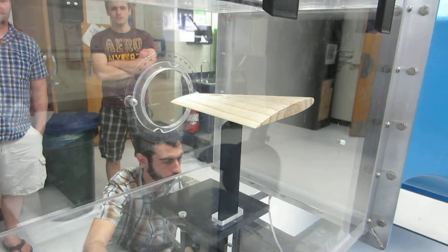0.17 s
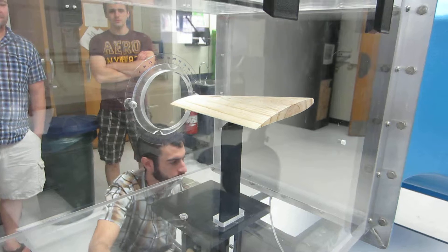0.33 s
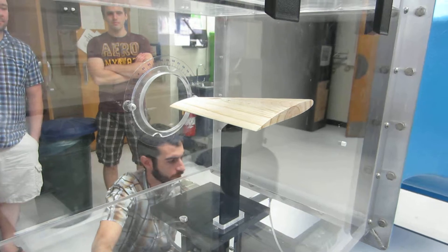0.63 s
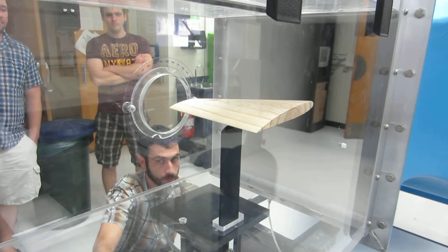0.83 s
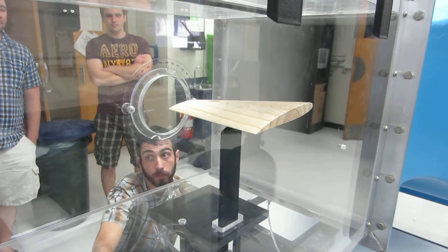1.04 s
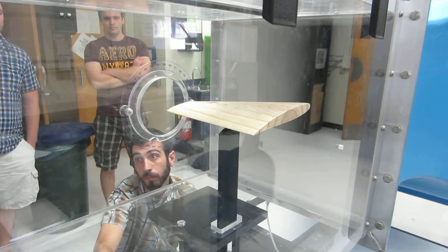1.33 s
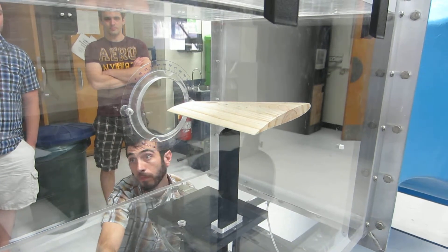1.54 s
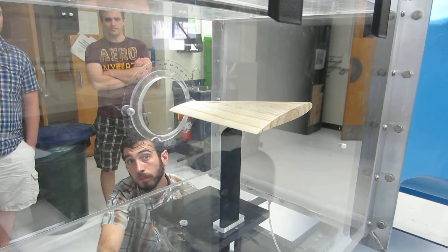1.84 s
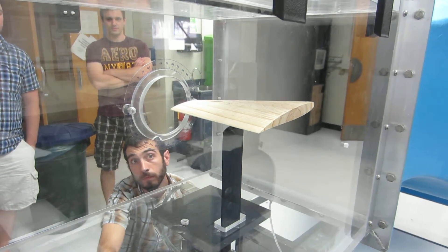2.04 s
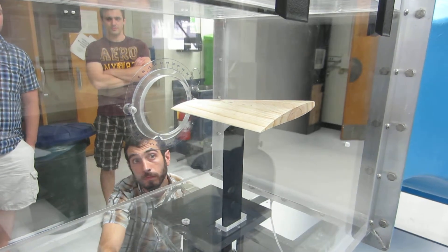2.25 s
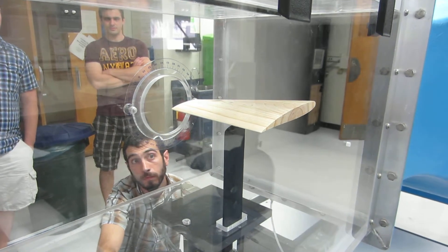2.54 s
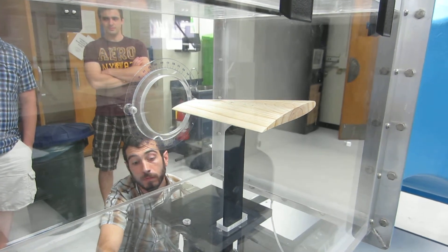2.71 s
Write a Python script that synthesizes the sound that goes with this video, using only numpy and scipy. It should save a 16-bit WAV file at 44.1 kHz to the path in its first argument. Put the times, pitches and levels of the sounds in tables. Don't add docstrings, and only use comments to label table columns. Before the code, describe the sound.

A large fan roars steadily, with a low sung tone and rushing air in a hard-walled laboratory.

```python
import sys
import numpy as np
from scipy import signal
from scipy.fft import rfft, irfft
from scipy.io import wavfile
from scipy.ndimage import uniform_filter1d

SR = 44100
rng = np.random.default_rng(int(sys.argv[2]) if len(sys.argv) > 2 else 0)


def convert_level_to_amplitude(level_db):
    exponent = np.asarray(level_db, float) / 20
    return 10 ** exponent


def int16_out(signal):
    q = np.round(np.clip(np.atleast_2d(signal).T, -1, 1) * 32767)
    wavfile.write(sys.argv[1], SR, q.astype(np.int16))


N = 127008


def slow(rate):
    step = 40
    memory = np.exp(-2 * np.pi * rate * step / SR)
    noise = rng.standard_normal(N // step + 2002)
    wander = signal.lfilter([1], [1, -2 * memory, memory ** 2], noise)[2000:]
    wander = (wander - wander.mean()) / wander.std()
    return np.interp(np.arange(N) / step, np.arange(len(wander)), wander)


def in_time(rows):
    times, *columns = np.transpose(rows)
    return [np.interp(np.arange(N) / SR, times, column) for column in columns]


def lab(hz):
    t60_s, wet_db, dull_hz = 0.5, -9.0, 700
    lags = rng.uniform(0.025, 0.06, 10)[:, None]
    trip = convert_level_to_amplitude(-60 * lags / t60_s) * np.exp(-2j * np.pi * hz * lags)
    echoes = np.sum(trip / (1 - trip), axis=0) / np.sqrt(len(lags))
    return 1 + convert_level_to_amplitude(wet_db) / np.hypot(1, hz / dull_hz) * echoes


def sloped(points, below_db, above_db):
    f, db = np.transpose(points)

    def shape(hz):
        inside = np.interp(np.log2(hz), np.log2(f), db)
        octaves_below = np.maximum(np.log2(f[0] / hz), 0)
        octaves_above = np.maximum(np.log2(hz / f[-1]), 0)
        return convert_level_to_amplitude(inside - below_db * octaves_below - above_db * octaves_above)

    return shape


def turbulence(shape, patchy_db, rate):
    size = N + SR
    hz = np.fft.rfftfreq(size, 1 / SR)[1:]
    full = np.r_[0, shape(hz) * lab(hz)] * rfft(rng.standard_normal(size))
    octave = np.clip(np.r_[0, np.log2(hz / 30)], 0, 9)
    together = slow(rate / 2)
    out = 0
    for k in range(10):
        window = np.clip(1 - abs(octave - k), 0, 1)
        flicker = convert_level_to_amplitude(patchy_db * (1.1 * together + slow(rate)))
        out = out + irfft(full * window, size)[:N] * flicker
    return out / out.std()


def whistles():
    # (frequency [Hz], level [dB])
    whistle_lines = [(11944, -88), (12064, -92), (12184, -89)]
    t = np.arange(N) / SR
    return sum(np.sqrt(2) * convert_level_to_amplitude(db) * np.sin(2 * np.pi * f * t) for f, db in whistle_lines)


def rush():
    # (frequency [Hz], level [dB per Hz])
    rush_spectrum = [(1000, -1), (1450, -5), (1900, -5.5), (2900, -9.5), (4200, -18.5), (6300, -21),
                     (9500, -34), (13500, -47)]
    shape = sloped(rush_spectrum, below_db=59.5, above_db=25)
    return convert_level_to_amplitude(-28.5) * turbulence(shape, patchy_db=0.29, rate=19.0)


def roar():
    # (frequency [Hz], level [dB per Hz])
    roar_spectrum = [(20, -32.5), (50, -12), (95, -12.5), (140, -11), (250, -3), (400, -6.5), (650, -1.5),
                     (1000, -8)]
    shape = sloped(roar_spectrum, below_db=19, above_db=55)
    return convert_level_to_amplitude(-22) * turbulence(shape, patchy_db=-0.1, rate=11.0)


def booms():
    # (frequency [Hz], width [Hz], level [dB])
    resonances = [(49.6, 5.4, -23), (131.5, 12.8, -8), (152.4, 7.7, -13.5), (203.8, 14.2, -9.5),
                  (276.7, 10, -15.5), (345.4, 12, -2.5), (359, 14.7, -7), (470, 39, -13), (541, 50, -13),
                  (694.5, 35, -14.5), (917, 21, -15), (1143, 16, -20), (1834, 69, -24.5)]

    def shape(hz):
        peaks = [convert_level_to_amplitude(db) / (1 + (2 * (hz - f) / width) ** 2) for f, width, db in resonances]
        return np.sqrt(sum(peak ** 2 for peak in peaks))

    return convert_level_to_amplitude(-23) * turbulence(shape, patchy_db=0.3, rate=8.0)


def duct():
    # (time [s], level [dB])
    surge_levels = [(0.07, -23.5), (0.1, -18), (0.21, -19), (0.23, -32), (0.37, -21.5), (0.7, -30),
                    (0.96, -19.5), (1.04, -43), (1.11, -18.5), (1.15, -27), (2.19, -24), (2.24, -35),
                    (2.29, -20), (2.32, -31), (2.64, -25.5), (2.88, -36)]
    duct_hz, width_hz, evening = 297.7, 18.4, 0.73

    def shape(hz):
        return 1 / (1 + (2 * (hz - duct_hz) / width_hz) ** 4)

    ring = signal.hilbert(turbulence(shape, patchy_db=-2.0, rate=5.0))
    swell = np.sqrt(uniform_filter1d(abs(ring) ** 2, size=4000))
    ring = ring.real / swell ** evening
    return convert_level_to_amplitude(in_time(surge_levels)[0]) * ring / ring.std()


def tones():
    # (time [s], blade tone [dB], motor whine [dB], unbalance hum [dB])
    fan_levels = [
        (0.07, -22, -51, -32.5),
        (0.45, -28.5, -40.5, -30.5),
        (0.8, -20.5, -38, -29),
        (1.2, -19.5, -34, -34.5),
        (1.8, -19, -37, -32),
        (2.05, -22.5, -40, -38),
        (2.5, -19.5, -41, -34.5),
        (2.88, -21.5, -37.5, -33.5),
    ]
    # (multiple of shaft speed [-], level [dB])
    weak_orders = [
        (1, -61),
        (4, -40.5),
    ]
    blade_db, whine_db, hum_db = in_time(fan_levels)
    full_turns_per_s, shortfall, settled_s = 36.9, 0.022, 1.25
    still_to_go = np.clip(1 - np.arange(N) / SR / settled_s, 0, 1) ** 1.4
    turns_per_s = full_turns_per_s * (1 - shortfall * still_to_go)
    angle = 2 * np.pi * np.cumsum(turns_per_s) / SR
    lines = [(9, blade_db), (34.93, whine_db), (2, hum_db)]
    lines += [(round(k), db) for k, db in weak_orders]
    out = 0
    for k, db in lines:
        loudness = np.sqrt(2) * convert_level_to_amplitude(db + 0.6 * slow(3.0))
        out = out + loudness * np.sin(k * angle + rng.uniform(0, 2 * np.pi))
    return out


def scene():
    # (time [s], gain [dB])
    volume_control = [(0.07, -24.5), (0.1, -28.5), (0.25, -30.5), (0.83, -31), (0.86, -36), (0.87, -31.5),
                      (1.2, -33), (1.29, -31), (1.46, -32.5), (1.73, -31.5), (2.24, -34), (2.88, -33)]
    gain_db = in_time(volume_control)[0]
    air = rush() + roar() + booms()
    mix = air * convert_level_to_amplitude(gain_db - gain_db.mean()) + duct() + tones()
    return mix[None]


def low_pass(x):
    return signal.sosfilt(signal.butter(12, 16840, fs=SR, output="sos"), x)


def record(dry):
    top_hz, start_s = 15740, 3200 / SR
    hz = np.fft.rfftfreq(2 * N, 1 / SR)
    dip_db = -10 * np.exp(-((hz - 11500) / 1100) ** 2)
    droop_db = -4.5 * np.clip((hz - 14500) / 300, 0, 1)
    response = (hz < top_hz) * convert_level_to_amplitude(dip_db + droop_db)
    mirrored = np.c_[dry, dry[:, ::-1]]
    x = irfft(rfft(mirrored) * response, 2 * N)[:, :N]
    x = x + whistles()
    opened = np.arange(N) / SR >= start_s
    return low_pass(x * opened)


dry = scene()
out = record(dry)
int16_out(out)
```